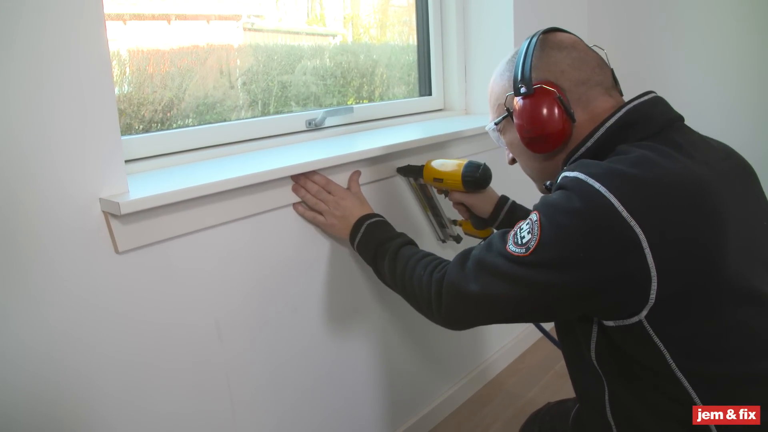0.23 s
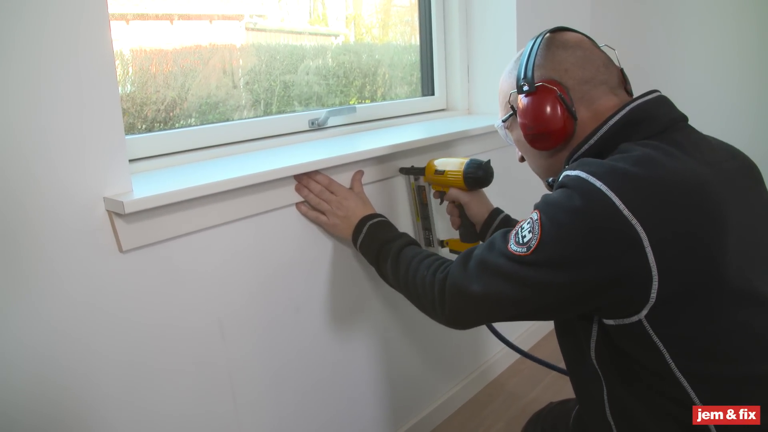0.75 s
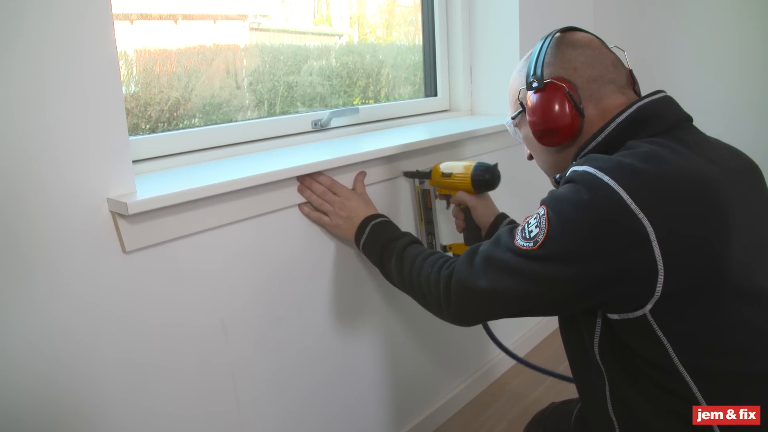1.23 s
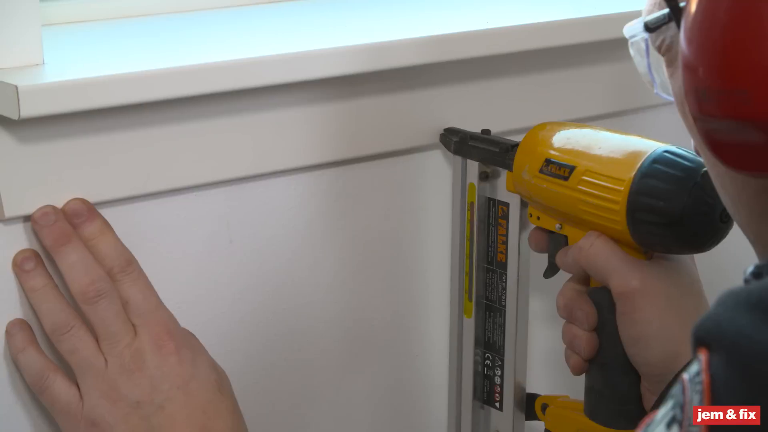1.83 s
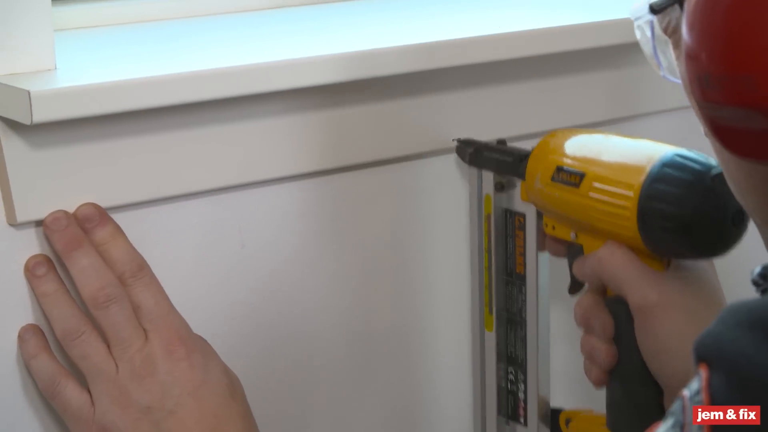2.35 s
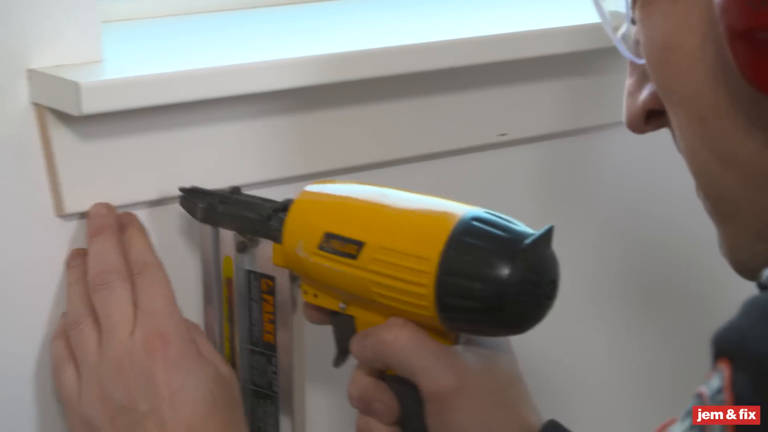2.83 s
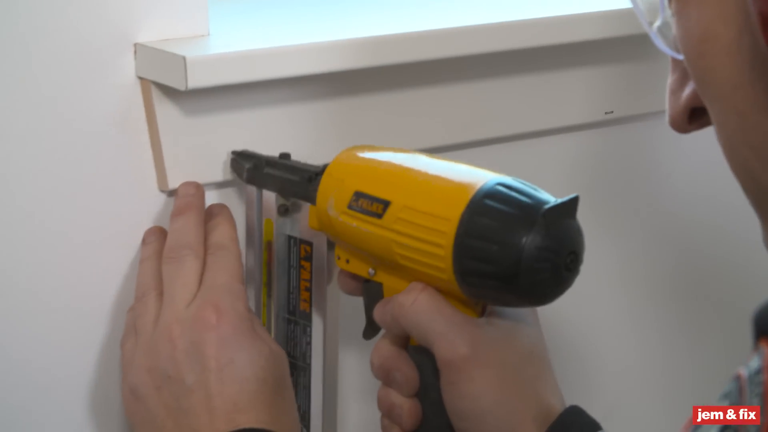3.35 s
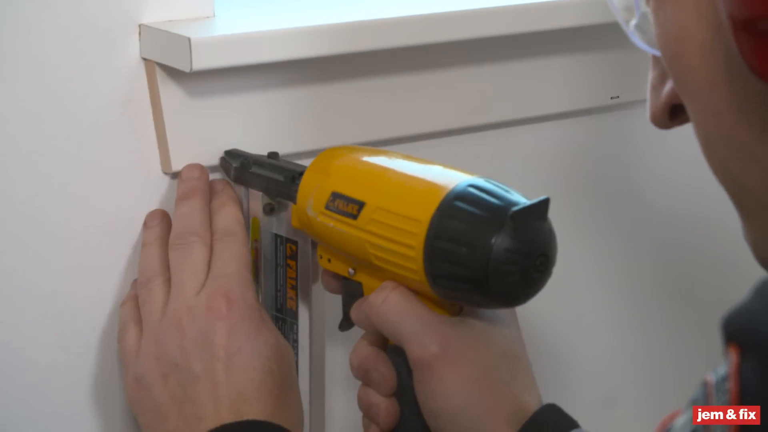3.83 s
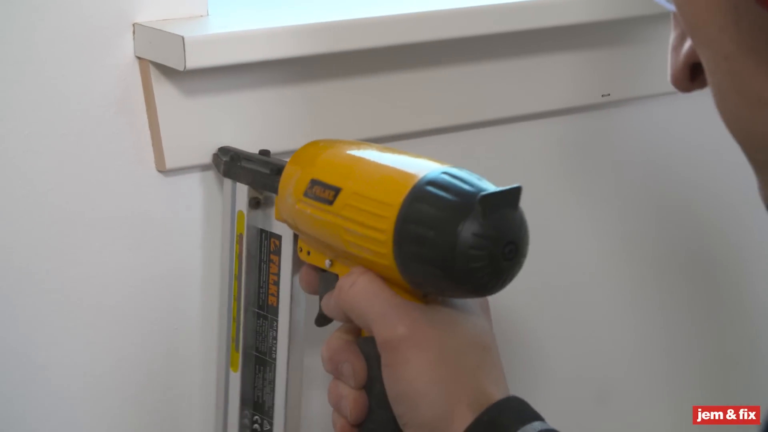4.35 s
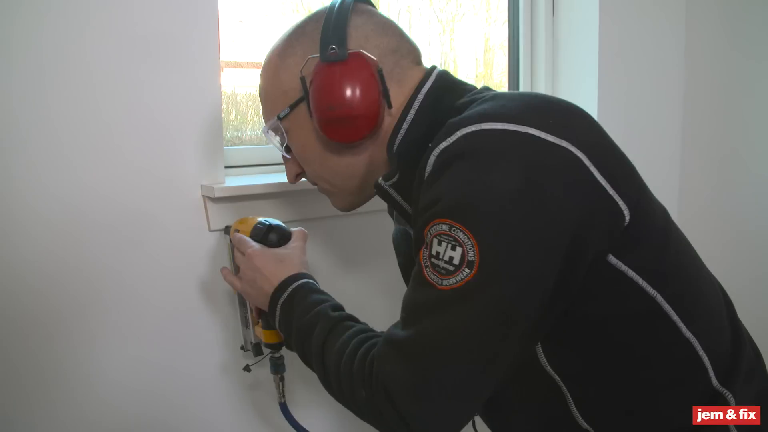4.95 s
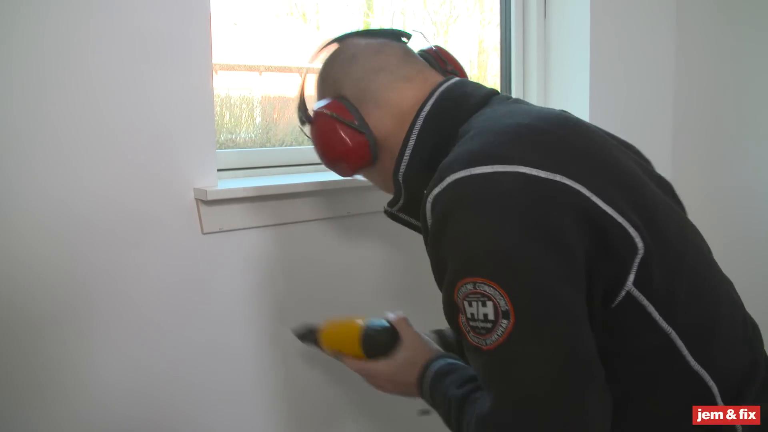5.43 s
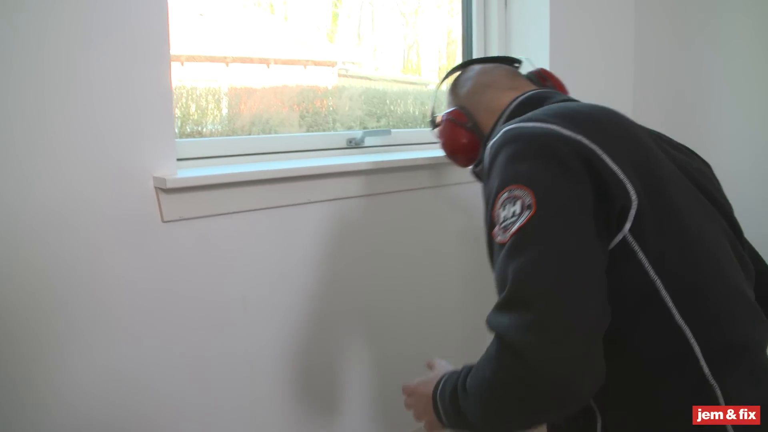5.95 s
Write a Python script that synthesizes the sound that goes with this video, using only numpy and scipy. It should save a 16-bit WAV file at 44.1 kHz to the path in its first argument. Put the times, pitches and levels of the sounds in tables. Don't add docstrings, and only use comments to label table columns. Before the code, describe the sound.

Three sharp pneumatic nail shots ring off hard walls, each followed by an air blow, with tool knocks, ticks and cloth rustle between.

```python
import sys
import numpy as np
from scipy import signal
from scipy.fft import rfft, irfft
from scipy.io import wavfile
from scipy.ndimage import uniform_filter1d, minimum_filter1d

SR = 44100
rng = np.random.default_rng(int(sys.argv[2]) if len(sys.argv) > 2 else 0)


def materialize(psi):
    bounded = np.clip(np.atleast_2d(psi).T, -1, 1)
    quanta = np.round(bounded * 32767).astype(np.int16)
    wavfile.write(sys.argv[1], SR, quanta)


def voltage_ratio(decibels):
    exponent = np.asarray(decibels, float) / 20
    return 10 ** exponent


N = 273420


def rms_one(x):
    return x / np.sqrt(np.mean(x ** 2) + 1e-20)


def filtered(x, order, hz, kind="low"):
    return signal.sosfilt(signal.butter(order, hz, kind, fs=SR, output="sos"), x)


def dull(x):
    return filtered(x, 2, 1500)


def at_hz(points, hz):
    point_hz, values = np.array(points).T
    return np.interp(np.log(hz), np.log(point_hz), values)


def coloured(x, spectrum):
    hz = np.arange(len(x) // 2 + 1) * SR / len(x) + 1
    return rms_one(irfft(rfft(x) * voltage_ratio(at_hz(spectrum, hz)), len(x)))


def add(track, start_s, sound):
    i = round(start_s * SR)
    track[i:i + len(sound)] += sound[:N - i]


def slow_chance(width_hz, shape):
    r = np.exp(-2 * np.pi * width_hz / SR)
    return signal.lfilter([1], [1, -2 * r, r * r], rng.standard_normal(shape))


def ring(hz, t60, size=4096):
    t = np.arange(size) / SR
    return np.sin(2 * np.pi * hz * t) * voltage_ratio(-60 * t / t60)


WAVER = 0.5
CONTACT_S = 0.00088


def rough_ring(hz, t60, size, width_hz):
    t = np.arange(size) / SR
    along, across = WAVER * rms_one(slow_chance(width_hz, (2, size + 2000))[:, 2000:])
    phase = 2 * np.pi * hz * t
    wave = (1 + along) * np.sin(phase) + across * np.cos(phase)
    return wave * voltage_ratio(-60 * t / t60) * (1 - np.exp(-t / CONTACT_S))


def crack(length_s, centre_hz):
    t = np.arange(4096) / SR
    envelope = np.exp(-t / 0.00035) + voltage_ratio(-2) * np.exp(-t / length_s)
    band_hz = [.5 * centre_hz, min(2 * centre_hz, 17000)]
    return filtered(rng.standard_normal(4096) * envelope, 2, band_hz, "band")


# pitch_hz, level_db (per Hz)
FLOOR_COLOUR = [(12, 10), (20, 9), (88, 3), (293, 2), (357, -9.5), (590, -4.5), (642, -9), (1960, -18.5),
                (6360, -17.5), (14700, -20.5), (16000, -31)]


def quiet_room():
    return voltage_ratio(-66) * coloured(rng.standard_normal(N), FLOOR_COLOUR)


# pitch_hz, t60_s
ROOM_T60 = [(40, 0.15), (100, 0.8), (200, 0.45), (500, 0.66), (2000, 0.66), (6000, 0.63), (14000, 0.4)]
# pitch_hz, level_db, t60_s
ROOM_MODES = [(110, -27.5, 0.18), (158, -31.5, 0.93), (296, -24, .6)]


def reflections():
    size = SR
    t, tail = np.arange(size) / SR, np.zeros(size)
    edges_hz = 28 * 2 ** np.arange(0, 9.6, .5)
    white = rng.standard_normal((2, size))
    for k, (low, high) in enumerate(zip(edges_hz, edges_hz[1:])):
        t60 = at_hz(ROOM_T60, np.sqrt(low * high))
        tail += filtered(white[k % 2], 2, [low, high], "band") * voltage_ratio(-60 * t / t60) / np.sqrt(t60)
    for hz, level_db, t60 in ROOM_MODES:
        tail += voltage_ratio(level_db) * ring(hz, t60, size)
    slaps = (rng.random(size) < 500 / SR) * rng.standard_normal(size) * np.exp(-t / 0.052)
    tail = tail * (1 - np.exp(-t / 0.0025)) + voltage_ratio(21) * dull(slaps)
    return tail / np.sqrt(np.sum(tail ** 2))


SCENE_STARTS_S = [0, 1.864, 4.93, 7]


def scene_change_after(s):
    return min(change for change in SCENE_STARTS_S if change > s)


def room(x):
    t, out = np.arange(N) / SR, np.zeros(N)
    for start, end in zip(SCENE_STARTS_S, SCENE_STARTS_S[1:]):
        part = (t >= start) & (t < end)
        out += signal.fftconvolve(x * part, reflections())[:N] * part
    return out


def gestures(rows):
    out, touch_s = np.zeros(N), 0.005
    for s, length, start_db, change_db in rows:
        fade = 0.01 + 0.72 * length
        t = np.arange(round((length + fade) * SR)) / SR
        edges = np.clip(np.minimum(t / touch_s, (length + fade - t) / fade), 0, 1) ** 2
        add(out, s, voltage_ratio(start_db + change_db * t / length) * edges * (s + t < scene_change_after(s)))
    return out


def grains(per_s, spread_db):
    sizes = voltage_ratio(spread_db * np.minimum(rng.exponential(1, N), 5)) * rng.choice([-1, 1], N)
    return sizes * (rng.random(N) < per_s / SR)


# start_s, length_s, level_db, change_db (to the end)
THUDS = [(0.0, .05, -63, -8), (.13, 0.14, -69, 0), (.52, 0.13, -56, -14), (.74, 0.13, -70.5, 10),
         (.96, 0.067, -51, -6), (2.14, .04, -66, -3), (3.52, 0.32, -60.5, -6.5), (3.82, 0.15, -54, -16.5),
         (4.05, .2, -65, -5.5), (4.45, 0.24, -68, 2), (4.93, 0.072, -59.5, 9), (5.5, .2, -55, -3.5),
         (6.09, 0.068, -54, -6.5)]


def thuds():
    lumps = filtered(rng.standard_normal(N), 2, [45, 150], "band")
    return (gestures(THUDS) + voltage_ratio(-72.5)) * rms_one(lumps)


# start_s, level_db (peak), pitch_hz, length_s
BUMPS = [
    (0.7, -53, 59.7, 0.028),
    (0.737, -54, 65, 0.024),
    (.778, -52, 110, 0.027),
    (.84, -42, 69, 0.043),
    (0.952, -39.5, 94, 0.071),
    (3.375, -50, 78, 0.042),
    (6.112, -42, 70, 0.022),
]


def bumps():
    out = np.zeros(N)
    for s, peak_db, hz, length in BUMPS:
        t = np.arange(round(length * SR)) / SR
        wobble = 1 + 0.29 * np.sin(2 * np.pi * t / length + 6 * rng.random())
        swell = np.sin(np.pi * t / length) ** 0.91
        add(out, s, voltage_ratio(peak_db) * swell * np.sin(2 * np.pi * hz * np.cumsum(wobble) / SR))
    return out


# start_s, length_s, level_db, change_db (to the end)
RUSTLES = [(0.0, 0.27, -68, -13), (.55, 0.25, -87, -1.5), (.83, 0.071, -64.5, -13), (1.0, 0.052, -67, -13),
           (1.055, 0.034, -64, -12), (1.62, 0.052, -65, -10), (1.7, 0.14, -53.5, -9.5),
           (1.9, .25, -84, 0.5), (2.155, .025, -71, 1), (2.73, 0.32, -54, -6), (3.04, 0.14, -66.5, -9),
           (3.22, 0.3, -73.5, -5), (3.543, 0.051, -48.5, -19), (3.641, 0.12, -44.5, -48),
           (3.82, 0.29, -74, -5), (4.05, 0.055, -63, -0.5), (4.12, 0.32, -68, -4), (4.47, 0.069, -72.5, 0),
           (4.54, 0.23, -68.5, 7), (4.93, 0.065, -69.5, 13), (5.5, 0.053, -47.5, -16),
           (5.578, 0.18, -41.5, 0.5), (5.755, 0.047, -38, 6), (5.815, 0.054, -28.5, -1),
           (5.87, 0.21, -30, -10), (6.1, 0.08, -41.5, -8)]
# pitch_hz, level_db (per Hz)
CLOTH_COLOUR = [(880, -13), (1500, -1), (2460, -3.5), (2640, -3), (4290, -5.5), (6240, -6.5), (9190, -15.5),
                (13400, -15.5), (16000, -25.5)]


def rustles():
    crumple = rms_one(voltage_ratio(1.2 * rms_one(slow_chance(30, N))))
    return gestures(RUSTLES) * coloured(grains(16000, spread_db=2.5), CLOTH_COLOUR) * crumple


# start_s, length_s, level_db, change_db (to the end)
SLIDES = [(0.0, 0.12, -57.5, -2.5), (.135, .2, -52, 0.5), (.46, 0.038, -53.5, -17), (.52, 0.13, -56, -16),
          (1.06, .03, -62, -1), (1.62, 0.046, -58, -10), (1.7, 0.15, -47.5, -8.5), (2.155, .03, -76, 0),
          (2.73, 0.37, -50.5, -11), (3.24, 0.092, -57, -5.5), (3.36, .14, -59, -7),
          (3.54, 0.22, -50.5, -4.5), (3.82, 0.22, -49.5, -20.5), (4.05, 0.31, -65.5, -5),
          (4.51, 0.29, -64, -1), (5.5, 0.056, -47, -3), (5.565, 0.26, -39.5, -2.5), (5.93, 0.26, -40, -5)]
# pitch_hz, level_db (per Hz)
SLIDE_COLOUR = [(88, -53.5), (150, -43), (166, -16.5), (247, -13), (304, -10.5), (387, -10.5), (716, -14),
                (756, -21.5), (1300, -57.5), (1690, -81), (2860, -120)]


def slides():
    slips = coloured(grains(700, spread_db=2.5), SLIDE_COLOUR)
    panel_hz, panel_width_hz = 315, 88
    hum = signal.lfilter(*signal.iirpeak(panel_hz, panel_hz / panel_width_hz, fs=SR), slips)
    return gestures(SLIDES) * rms_one(slips + voltage_ratio(0.5) * rms_one(hum))


# start_s, length_s, level_db, change_db (to the end)
SCRAPES = [(0.0, 0.33, -68.5, -2.5), (.47, 0.028, -66, -7.5), (.53, 0.22, -76, -6), (.83, 0.062, -75, -5),
           (1.0, 0.061, -56, -16), (1.62, .08, -72.5, -2.5), (1.7, 0.15, -40, -19.5),
           (2.73, 0.45, -56.5, -11), (3.38, 0.051, -71.5, -14), (3.58, .15, -44.5, -11),
           (3.758, 0.048, -50, -8), (3.84, 0.12, -56.5, -18), (4.05, 0.29, -68, -3), (4.42, 0.17, -70.5, 7),
           (4.64, 0.18, -58, -6.5), (5.5, .07, -43.5, -12), (5.578, 0.038, -23.5, -8),
           (5.6, 0.15, -28, -3.5), (5.78, 0.26, -30, -6.5), (6.1, 0.12, -41, -11)]
# pitch_hz, level_db (per Hz)
SCRAPE_COLOUR = [(210, -66), (350, 3.5), (493, 16), (611, 8.5), (793, 14.5), (868, 12), (1310, 6.5),
                 (1580, 1.5), (2460, -15.5), (3000, -8), (3900, -8.5), (6600, -120)]


def scrapes():
    return gestures(SCRAPES) * coloured(grains(1500, spread_db=1.5), SCRAPE_COLOUR)


# start_s, level_db (peak), pitch_hz, ring_db (re
# snap), rattle_s
TICKS = [(0.3114, -50, 2500, -11, 0.0036), (0.8279, -49, 5000, -14, 0.0071),
         (1.0534, -46, 7490, -16, 0.0033), (1.73, -34.5, 5100, -8, 0.01), (1.746, -28, 2940, -14, 0.0044),
         (2.0536, -58.5, 5510, -5.5, 0.0029), (2.064, -57, 3330, -10, 0.0037),
         (2.0726, -65, 8470, -12, 0.0043), (2.0928, -64.5, 3250, -5.5, 0.0034),
         (2.1236, -58.5, 3760, 0.5, 0.0033), (3.0693, -43.5, 5200, -14, 0.0032),
         (3.383, -45, 3410, -8, 0.0057), (4.0528, -47, 6060, 0, 0.0037), (4.482, -39.5, 3610, -12, 0.005),
         (4.5082, -46.5, 3200, -7.5, 0.0034), (4.868, -52, 3250, -24, 0.0051),
         (4.8861, -54, 3010, -5.5, 0.0046), (5.631, -30, 3520, -0.5, 0.0026),
         (5.7614, -19, 3480, -5, 0.0036), (5.814, -17, 6540, -13, 0.0087), (5.8756, -28, 3456, -2, 0.0036),
         (6.0302, -22.5, 5890, -3, 0.0047), (5.633, -31, 8900, -4, .003), (5.819, -21, 8500, -3, .004),
         (6.022, -34, 9000, -15, .003), (6.035, -33, 10000, -15, .002), (4.644, -47, 2000, -15, .004),
         (6.1205, -10.5, 3000, -32, .0008),
         (1.006, -54, 3300, 4, .004), (1.061, -50, 7100, 7.5, .003), (1.074, -40, 4500, -5.5, .004),
           (2.994, -30, 4240, -25, 0.017), (4.984, -28, 5970, -8, .004), (6.096, -33, 12000, -21.5, .002),
           (6.107, -23, 9000, -21, 0.0099), (6.112, -17.5, 5610, -2, 0.005),
           (6.121, -19.5, 7105, 1.5, 0.0033), (3.825, -46, 5000, -18, 0.0037), (3.76, -50, 4020, -13, .006)]


def ticks():
    snaps, pings = np.zeros((2, N))
    for s, peak_db, hz, ring_db, rattle_s in TICKS:
        add(snaps, s, voltage_ratio(peak_db - 9) * crack(rattle_s, hz))
        add(pings, s, voltage_ratio(peak_db + ring_db - 6) * rough_ring(hz, .035, 4096, width_hz=150))
    return snaps, pings


# start_s, level_db (peak), tick_db (bright part re peak),
# pitch_hz (wood)
KNOCKS = [(0.465, -49, -24, 670), (0.531, -52, -34, 392), (0.828, -40, -14, 250), (1.002, -38, -36.5, 515),
          (1.702, -26, -52.5, 547), (1.952, -46.5, -12.5, 555), (2.154, -37.5, -3, 361),
          (3.261, -40, -7, 296), (3.541, -13, -30, 329), (3.546, -18.5, -3, 424), (3.643, -27.5, 14, 497),
          (3.697, -30, -39.5, 519), (3.761, -31.5, -31, 480), (3.824, -26, -20, 421),
          (4.643, -30.5, -10, 433), (5.576, -4, -33, 658), (6.121, -21, 13, 1043),
          (1.073, -39, -24, 512),
    (4.957, -29, -22, 474),
    (4.98, -18.5, -17.5, 467),
]
# pitch_ratio (re knock pitch), level_db, t60_s
WOOD_MODES = [(.62, -16, 0.053), (1.0, 5.5, 0.059), (1.449, 4, .04), (2.1, -11.5, 0.039),
              (2.698, -2.5, 0.033), (3.5, -9, .03), (4.498, -12, .025)]
# pitch_hz, level_db
METAL_MODES = [(4500, 0), (4850, -3), (6900, -6.5), (10500, -5)]


def knocks():
    out, t = np.zeros(N), np.arange(4096) / SR
    thud_envelope = np.exp(-t / 0.01) * (1 - np.exp(-t / CONTACT_S))
    gripped_t60_s = .012
    for s, peak_db, bright_db, pitch in KNOCKS:
        chance = rng.standard_normal(32)
        thud = rms_one(filtered(rng.standard_normal(4096), 2, [.7 * pitch, 3.5 * pitch], "band"))
        wood = voltage_ratio(2.5) * thud * thud_envelope
        for (ratio, db, t60), c in zip(WOOD_MODES, chance):
            wood += voltage_ratio(db + 1.1 * c) * rough_ring(pitch * ratio, t60, 4096, width_hz=40)
        metal = sum(voltage_ratio(db + 2 * c) * ring(hz, gripped_t60_s) for (hz, db), c in zip(METAL_MODES, chance[8:]))
        bright = voltage_ratio(5.5) * crack(0.0077, 6800) + voltage_ratio(-12.5) * metal
        add(out, s, voltage_ratio(peak_db - 23) * (wood + voltage_ratio(bright_db) * bright))
    return filtered(out, 2, 180, "high")


# valve_s, drive_s (piston), exhaust_s, return_s (piston), exhaust_db (re usual)
SHOTS = [
    (1.086, 1.119, 1.236, 1.35, 0.5),
    (2.18, 2.206, 2.335, 2.365, 0),
    (4.993, 5.023, 5.15, 5.19, 0.1),
]
# start_s, pitch_hz, level_db (before
# the limiter), t60_s
STRUCK_RINGS = [(1.119, 286, -17.5, 0.65), (1.119, 305.8, -15.5, 0.39), (1.119, 346, -17, 0.32),
                (2.208, 360, -21.5, 0.18), (2.208, 562, -16, 0.26), (5.022, 692, -11, 0.25),
                (5.022, 778, -10, 0.41), (5.022, 845, -12.5, 0.4), (1.701, 502, -37, 0.46),
                (3.541, 1185, -34, 0.19), (5.577, 668, -26.5, 0.38), (3.543, 1030, -38, .25),
                (3.544, 1507, -40.5, 0.13), (3.544, 713, -32.5, 0.071), (3.645, 4760, -46, 0.12),
                (3.645, 4420, -47, .12), (3.645, 10500, -40, .03), (5.023, 1467, -8, 0.14),
                (5.022, 1620, -22, .12), (1.704, 1283, -49.5, 0.31),
                (1.119, 156.1, -22, .65), (2.336, 158, -25.5, .8), (5.022, 156, -30, .7),
              (1.24, 75, -13, 0.16), (1.236, 114, -20, .15), (2.336, 113.7, -14.5, 0.2),
              (2.336, 220, -15.5, 0.13), (2.34, 356, -16, 0.13), (5.152, 75.8, -23.5, 0.53),
              (5.155, 123.5, -15.5, 0.19), (5.15, 251, -17, 0.36), (2.208, 830, -13.5, 0.23),
              (2.208, 1407, -14, 0.23), (2.208, 1235, -20, 0.25), (2.208, 499, -13.5, 0.28),
              (2.25, 1530, -17, 0.19), (2.374, 1128, -26, 0.55), (2.374, 1238, -23, 0.33),
              (2.374, 770, -23.5, 0.33), (2.374, 294, -34, 0.4), (5.022, 969, -10, 0.48),
              (5.19, 975, -20.5, 0.35), (5.19, 1233, -24.5, 0.4), (5.19, 557, -20, .2),
              (5.19, 1117, -23, .45), (1.119, 568, -13.5, .22), (1.119, 826, -16, .25),
              (1.119, 1032, -17, 0.2), (1.274, 936, -25, 0.29), (1.274, 1332, -27.5, 0.48),
              (1.274, 442, -27.5, .35), (3.761, 708, -48, .12), (3.826, 1177, -45, .1),
              (3.826, 1640, -49, 0.076), (3.545, 158, -43, 0.26), (3.546, 3280, -46, 0.094),
              (3.546, 6900, -53, 0.17), (5.58, 1002, -28.5, .15), (5.6, 498, -28, 0.42),
              (5.855, 778, -31, .25), (3.824, 480, -33, .025), (3.83, 340, -47.5, .25),
              (3.644, 497, -41, .05), (3.697, 519, -42, .06), (1.702, 581, -42, 0.38),
              (1.702, 400, -41, .2), (1.702, 810, -46, .15), (3.544, 1360, -37, .12),
              (3.543, 1660, -43, 0.11), (5.95, 450, -36.5, 0.32), (2.336, 620, -18, .15),
              (2.336, 900, -20, .15)]
# pitch_hz, level_db (before the limiter), t60_s
HOUSING_MODES = [(2685, -19.5, .3), (3250, -17.5, .35), (3850, -19, .3), (4240, -19, .3), (4700, -17.5, .3),
                 (5620, -21, .25)]


def board():
    out = np.zeros(N)
    housing = [(drive, *mode) for _, drive, *_ in SHOTS for mode in HOUSING_MODES]
    for s, hz, level_db, t60 in STRUCK_RINGS + housing:
        left = round((scene_change_after(s) - s) * SR)
        add(out, s, voltage_ratio(level_db) * rough_ring(hz, t60, 3 * SR // 4, width_hz=5 + 0.022 * hz)[:left])
    return out


# pitch_hz, level_db, t60_s
WALL_MODES = [(31.8, -4.5, 0.16), (58.76, 7.5, 0.19), (110, 4.5, 0.34), (282, -12, 0.11), (709, -4.5, 0.47),
              (821, -4, 0.37), (957, -12.5, 0.24), (1540, -7.5, 0.2)]


def wall_boom(blows):
    modes = sum(voltage_ratio(db) * ring(hz, t60, SR // 4) for hz, db, t60 in WALL_MODES)
    return signal.fftconvolve(blows, modes)[:N]


# pitch_hz, level_db (per Hz)
JET_COLOUR = [(150, -33), (250, 1.5), (2130, -8.5), (2960, -3), (4570, -3), (5830, -7), (6820, -4),
              (9660, -5.5), (13700, -6), (16000, -6.5)]


def air():
    t = np.arange(N) / SR
    flow, burst, top_db = np.zeros((3, N))
    opening_s, leak_after_s = 0.0089, 0.04
    for valve, drive, exhaust, _, extra_db in SHOTS:
        fill_db = np.interp(t, [valve, drive, drive + leak_after_s, exhaust], [-21.5, -15.5, -20, -34.5])
        flow += voltage_ratio(fill_db) * np.clip((t - valve) / opening_s + .5, 0, 1) * (t < exhaust)
        since = np.maximum(t - exhaust, 0)
        blow_db = -23.5 - 1.3 * extra_db
        emptying_db = 750 * np.maximum(since - 0.11, 0) ** 2
        flow += voltage_ratio(blow_db - emptying_db) * np.clip(since / opening_s, 0, 1)
        top_db[t > valve] = -120 * since[t > valve] ** 2
        burst += voltage_ratio(-9 + extra_db) * np.exp(-since / 0.03) * np.clip(since / 0.0027, 0, 1)
    jet = coloured(rng.standard_normal(N), JET_COLOUR)
    low = filtered(jet, 1, 7000)
    return flow * (low + voltage_ratio(top_db) * (jet - low)) + burst * filtered(jet, 1, 2500, "high")


# pitch_hz, level_db (per Hz)
BANG_COLOUR = [(15, -26), (25, -7), (123, -7.5), (149, 3.5), (180, 1.5), (270, 1), (309, 0.5), (754, 2),
               (887, 2.5), (962, 2.5), (1480, -0.5), (1840, -4.5), (7110, -8), (14400, -21), (16000, -118)]
# level_db (before the limiter), dull_hz (dull above), direct_db (re room)
POP_KINDS = [
    (-9, 65, -22),
    (25.5, 10000, -4.5),
    (10.5, 350, 2),
    (7.5, 1600, 4.5),
]


def piston():
    size = 8192
    hz = np.arange(size // 2 + 1) * SR / size + 1
    cepstrum = irfft(np.log(voltage_ratio(at_hz(BANG_COLOUR, hz))))
    cepstrum[1:size // 2] *= 2
    cepstrum[size // 2 + 1:] = 0
    pulse = irfft(np.exp(rfft(cepstrum)))
    blows, direct = np.zeros((2, N))
    for shot in SHOTS:
        for s, (level_db, dull_hz, direct_db) in zip(shot, POP_KINDS):
            pop = filtered(pulse, 2, dull_hz)
            pop = voltage_ratio(level_db) * pop / np.sqrt(np.sum(pop ** 2))
            add(blows, s, pop)
            add(direct, s, -voltage_ratio(direct_db) * dull(pop))
    return blows, direct


def scene():
    hiss = air()
    blows, direct = piston()
    snaps, pings = ticks()
    taps = knocks() + snaps
    handling = thuds() + slides() + scrapes() + rustles()
    rings = voltage_ratio(-49) * wall_boom(blows) + board()
    close = hiss + direct + rings + taps + pings + bumps() + handling
    wet = room(voltage_ratio(-6) * hiss + blows + voltage_ratio(-5.5) * taps)
    return np.tile(close + wet + quiet_room(), (2, 1))


def roll_off(x):
    return signal.sosfilt(signal.butter(12, 16790, fs=SR, output="sos"), x)


def record(dry):
    limit_db, look_ahead_s, release_db_per_s = -9.5, 0.0015, 700
    ahead = max(round(look_ahead_s * SR), 1)
    fall_db = release_db_per_s * np.arange(N) / SR
    over_db = np.maximum(20 * np.log10(np.abs(dry[0]) + 1e-9) - limit_db, 0)
    held_db = np.maximum.accumulate(over_db + fall_db) - fall_db
    early_db = -minimum_filter1d(-held_db, 2 * ahead + 1)
    limited = dry * voltage_ratio(-.92 * uniform_filter1d(early_db, ahead))
    treble_limit = signal.ellip(10, .5, 60, 15750, fs=SR, output="sos")
    return roll_off(signal.sosfilt(treble_limit, limited))


dry = scene()
out = record(dry)
materialize(out)
```